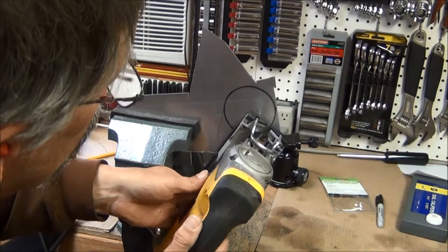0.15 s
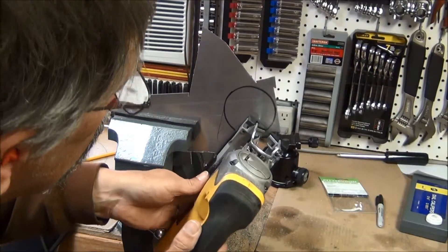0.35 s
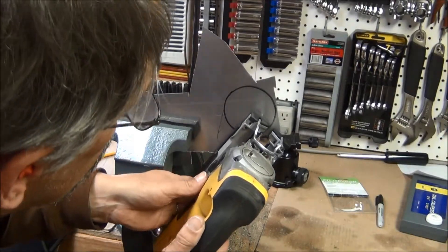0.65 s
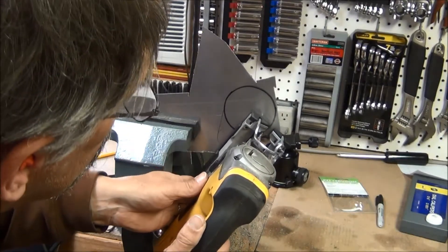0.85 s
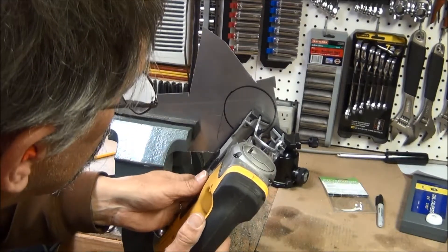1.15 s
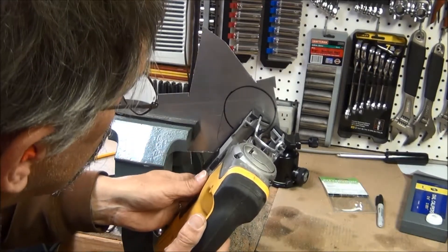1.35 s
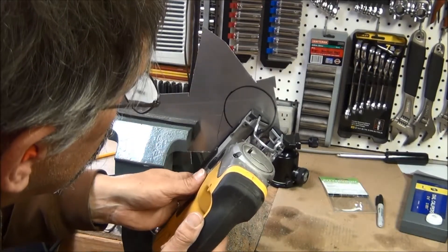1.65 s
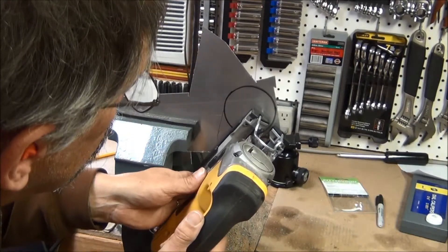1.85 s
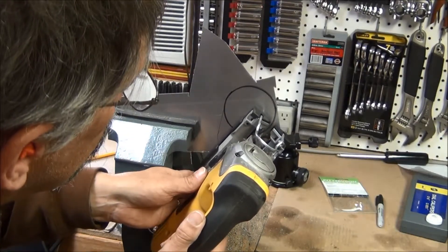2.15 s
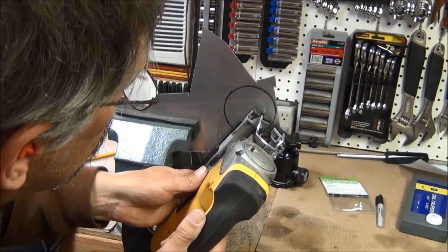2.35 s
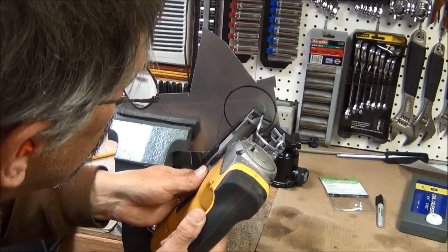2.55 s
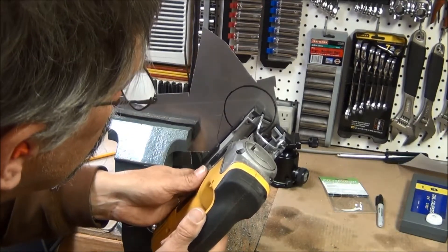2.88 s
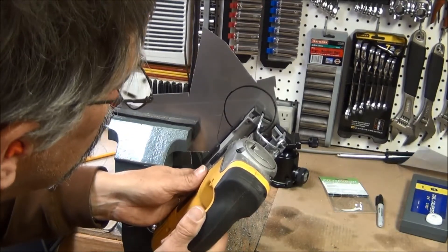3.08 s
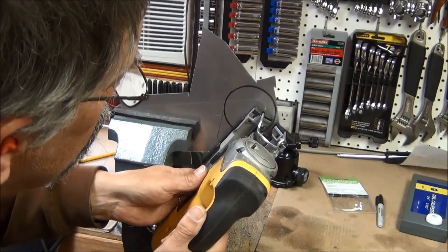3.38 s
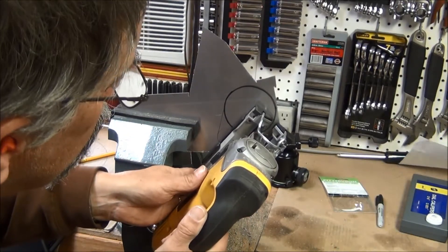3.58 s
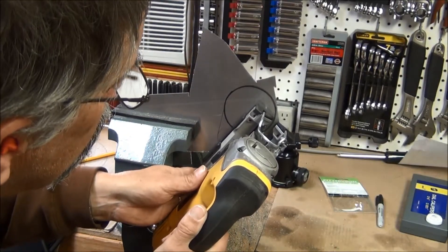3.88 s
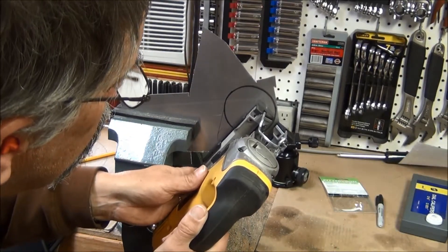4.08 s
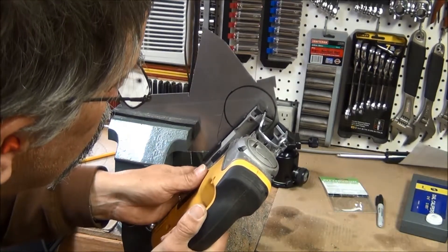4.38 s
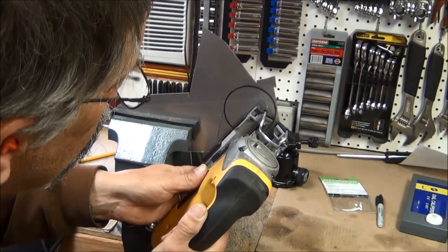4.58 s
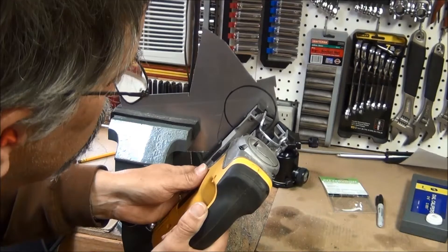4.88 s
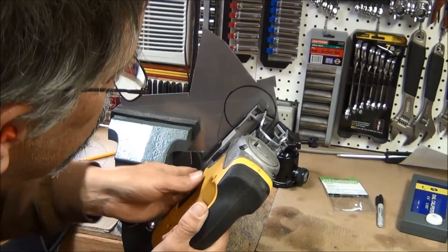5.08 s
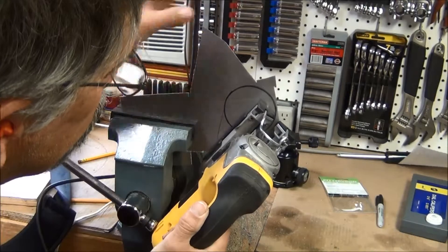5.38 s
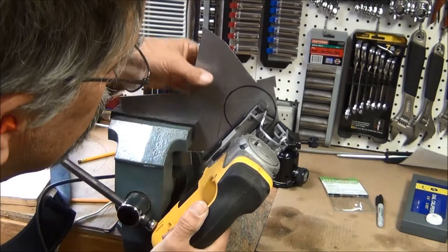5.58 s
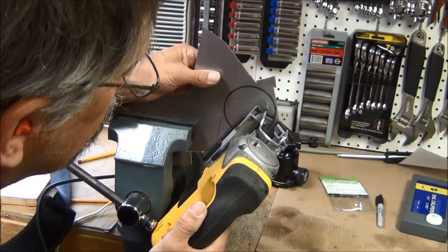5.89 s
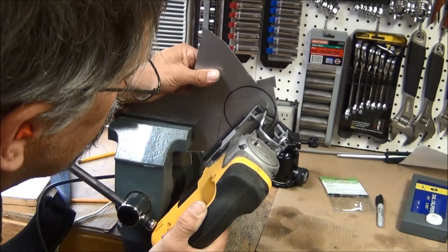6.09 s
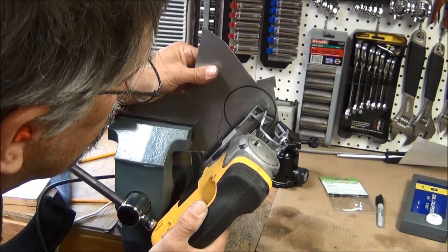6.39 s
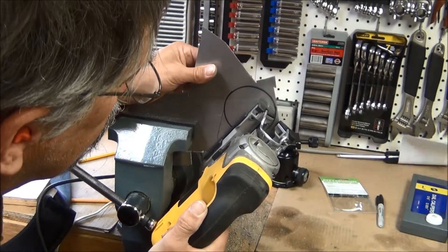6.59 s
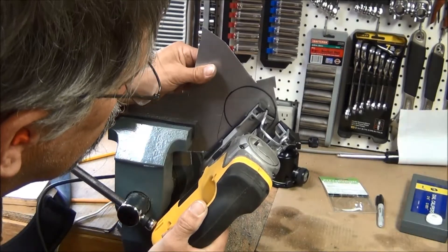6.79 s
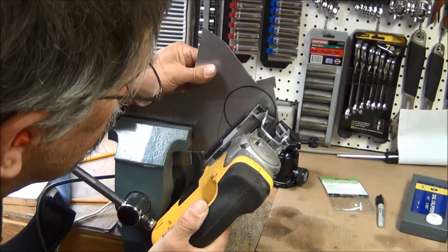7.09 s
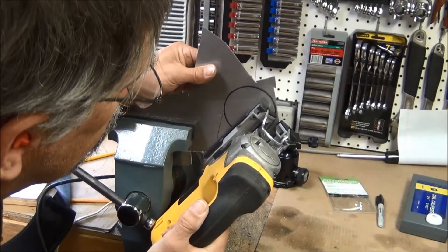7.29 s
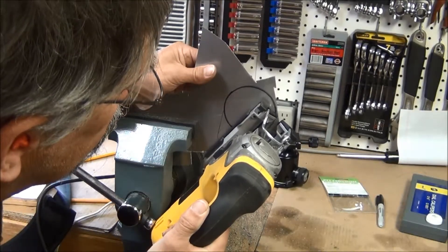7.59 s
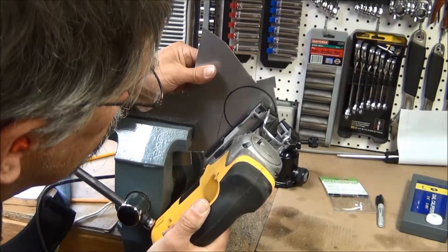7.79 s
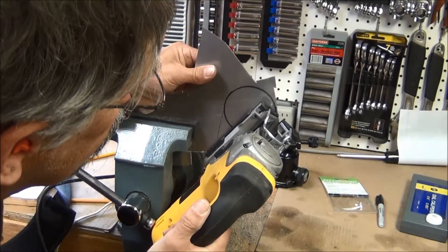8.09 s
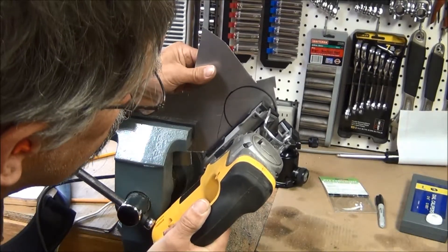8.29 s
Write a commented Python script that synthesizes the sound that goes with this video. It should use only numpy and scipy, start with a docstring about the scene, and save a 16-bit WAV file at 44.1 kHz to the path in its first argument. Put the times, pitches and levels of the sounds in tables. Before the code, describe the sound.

From 0 to 0.8 s there is only faint room hiss and hum, with soft taps and small knocks, clearest near 0.4. At about 0.85 the jigsaw switches on slowly, six or seven strokes a second, with dry motor whir and separate clicks. At 1.2 the blade hits the steel plate with a sharp knock, then skids, growling and ringing until 1.55. Strokes quicken to about thirteen a second; a hard knock lands near 1.95. From 2 to 5.2 it cuts steadily, rising to fifteen or so strokes a second: rasping teeth, metallic housing clatter, groaning gears, plate shudder and low bench thuds. Around 5.3 to 5.55 the teeth catch and let go, leaving rattle and small high squeaks. From 6.2 speed climbs rapidly, strokes blur near thirty-five a second, gears sing, and a high whine and low drone hold to the end. Close, dry, short workshop reflections.

```python
"""A jigsaw saws a steel plate held in a vise, in a small workshop; light taps and knocks come first.
Rasping noise from the teeth, clatter from the housing and thuds from plate and bench follow one crank phase.
At about 15 strokes a second each cutting stroke knocks and rasps while the gear mesh tone groans under load.
Then the trigger is pressed home: the strokes blur near 35 a second, the gears sing and the motor whines.
Noise through resonant filters makes the contacts; sines locked to the crank make gears, motor and drone."""
import sys
import numpy as np
from scipy import signal
from scipy.fft import rfft, irfft
from scipy.io import wavfile
from scipy.ndimage import uniform_filter1d

SR = 44100
rng = np.random.default_rng(int(sys.argv[2]) if len(sys.argv) > 2 else 0)


def unload_audio(sound):
    """Save the sound as a 16-bit wav file, at the path given as the first command line argument."""
    columns = np.transpose(np.atleast_2d(sound))
    # keep every value between -1 and 1, then stretch to whole-number steps
    steps = np.round(np.clip(columns, -1, 1) * 32767)
    wavfile.write(sys.argv[1], SR, steps.astype(np.int16))


N = 372644
TIME = np.arange(N) / SR


def amp(db):
    """Decibels to gain."""
    return 10 ** (np.asarray(db) / 20)


def unit(x):
    """Scales to rms 1."""
    return x / np.sqrt(np.mean(x ** 2) + 1e-20)


def curve(rows, axis=1, at=TIME):
    """One column of a table, joined by straight lines."""
    rows = np.asarray(rows, float)
    return np.interp(at, rows[:, 0], rows[:, axis])


def read(points, hz):
    """Values interpolated on a log-frequency axis."""
    f, value = np.transpose(points)
    return np.interp(np.log(hz + 1), np.log(f + 1), value)


def drift(rate_hz):
    """Random wander of rms 1, low-passed near rate_hz."""
    hz = np.fft.rfftfreq(N, 1 / SR)
    spectrum = rfft(rng.standard_normal(N)) * np.exp(-(hz / rate_hz) ** 2)
    return unit(irfft(spectrum, N))


def body(x, spectrum, modes=(), ring_db=0, size=8192):
    """Minimum-phase filter of energy 1: a broad colour with resonances standing on it."""
    hz = np.fft.rfftfreq(size, 1 / SR)
    power = amp(read(spectrum, hz)) ** 2
    for f, width_hz, db in modes:
        power = power + amp(db + ring_db) ** 2 / (1 + ((hz - f) / width_hz) ** 2) ** 2
    log_gain = np.log(np.r_[power, power[-2:0:-1]] + 1e-10) / 2
    # the Hilbert transform of the log gain gives the causal phase
    response = np.exp(np.conj(signal.hilbert(log_gain)))
    impulse = np.fft.ifft(response).real[:size // 2]
    return signal.oaconvolve(x, impulse / np.linalg.norm(impulse))[:N]


def grit(per_s, spread_db, share):
    """Tiny impacts of uneven size, holding a share of the power, in a smooth hiss."""
    sizes = amp(spread_db * np.minimum(rng.exponential(1, N), 4))
    hits = rng.random(N) < per_s / SR
    ticks = sizes * rng.choice([-1, 1], N) * hits
    share = np.clip(share, 0, 1)
    return np.sqrt(share) * unit(ticks) + np.sqrt(1 - share) * rng.standard_normal(N)


def spell(start_s, length_s, db, fade_s):
    """Gain that rises, holds for a length of time and falls."""
    to_edge_s = np.minimum(TIME - start_s, start_s + length_s - TIME)
    return amp(db) * np.clip(.5 + to_edge_s / fade_s, 0, 1)


def hump(turns, at, width):
    """A smooth swell at one place in every stroke."""
    offset = (turns - at + .5) % 1 - .5
    return np.exp(-.5 * (offset / width) ** 2)


# Trigger feathered by hand. Each row: time in s, strokes per s (until the trigger is pressed home).
SPEED = [(0.84, 6.01), (1.15, 7.21), (1.59, 12.8), (1.91, 12.16), (2.06, 13.37), (2.57, 12.77), (2.8, 13.0),
         (3.01, 14.6), (3.59, 15.92), (4.22, 15.73), (4.6, 15.04), (5.01, 15.08), (5.21, 16.16),
         (5.43, 15.03), (5.88, 14.71), (6.19, 16.56)]
# Pressed home: the rate closes in on full speed with this time constant.
PRESS_AT_S, RUN_UP_S, FULL_RATE_PER_S = 6.18, .36, 34.8


def crank():
    """Stroke rate per s, strokes done, and a gate that opens with the switch."""
    running = TIME > SPEED[0][0]
    lag = np.exp(-np.maximum(TIME - PRESS_AT_S, 0) / RUN_UP_S)
    rate = FULL_RATE_PER_S + (curve(SPEED) - FULL_RATE_PER_S) * lag
    turns = .002 + np.cumsum(rate * running) / SR
    return rate, turns, running


# Depth of the teeth. Each row: time in s, relative bite (0 = blade slides freely both ways).
BITE = [(1.5, 0.22), (1.58, 0.42), (1.7, 0.15), (2.0, 0.43), (4.3, 0.54), (5.15, 0.38), (5.3, 0.3),
        (5.56, .02)]
# Force through one stroke in the cut, before levelling. Each row: share of the stroke, blade in dB,
# gear case in dB, gear load in dB.
CUT = [(0, 4, -18, -22), (.06, -1.5, 0, -22), (.13, 0.5, -1, -12), (.3, -0.5, 4.5, -20), (.44, -6.5, 7, 5),
       (.55, -4.5, 5.5, 12), (.68, -9.5, 1.5, 6), (.82, -13.5, -1.5, 18), (.96, -9.5, -3, 16)]


def stroke(turns, axis, slide_db):
    """Force through the stroke: lightly shaped by CUT in the air, by slide_db when sliding, by CUT in the cut."""
    bite = np.clip(1.3 * curve(BITE), 0, 1)
    touching = np.clip((TIME - 1.17) / 0.059, 0, 1)
    force = amp(bite * curve(CUT, axis, turns % 1) + (1 - bite) * touching * slide_db)
    return force / np.sqrt(uniform_filter1d(force ** 2, size=11025))  # running rms over 0.25 s


def slap(turns, rate, decay_s):
    """A short burst once a stroke, as the blade turns round and takes up the play; slow strokes catch hardest."""
    catch = np.interp(rate, [13, 16], [1.2, .65])
    age_s = (turns % 1) / rate
    return catch * np.exp(-age_s / decay_s) * np.clip(curve(BITE), 0, 1)


# How hard the blade bears on the plate. Each row: time in s, force in dB (weighted by each part).
FEED = [(1.203, 0), (1.212, 7.5), (1.3, 4), (1.58, 4), (1.64, -8), (1.8, -1.5), (1.96, 3), (3.4, -1.5),
        (4.3, 0), (5.1, 0.5), (5.3, -3.5), (5.5, 0), (5.65, -3.5), (6.0, -3), (6.45, -4), (7.2, -8)]
# CUT_RATE_PER_S: stroke rate at which octave_db adds nothing
CUT_RATE_PER_S, WAKE_S = 15, 0.092


def work(rate, db, feed_share, octave_db, start_db):
    """Gain of a part: builds after switch-on, follows the feed force, shifts by octave_db per speed doubling."""
    waking = np.exp(-np.maximum(TIME - SPEED[0][0], 0) / WAKE_S)
    speed_db = octave_db * np.log2(rate / CUT_RATE_PER_S)
    return amp(db + feed_share * curve(FEED) + speed_db + start_db * waking)


def repeating(noise, rate, turns, share, count):
    """Fast and light, the mechanism repeats its jolts every turn: count uneven lines replace low noise."""
    lines = amp(2 * rng.standard_normal(count)) * np.exp(2j * np.pi * rng.random(count))
    one_turn = unit(irfft(np.r_[0, lines], count * 20))
    comb = np.interp(turns % 1, np.arange(len(one_turn)) / len(one_turn), one_turn)
    comb = comb * np.sqrt(2 * count * rate / SR)  # as strong per Hz as the noise
    low_pass = signal.butter(2, count * rate.max(), fs=SR, output="sos")
    low = signal.sosfiltfilt(low_pass, noise)
    steady = np.clip(share, 0, 1) * np.interp(rate, [17, 28], [0, 1])
    return noise + (np.sqrt(1 - steady) - 1) * low + np.sqrt(steady) * comb


# Steady hum. Each row: frequency in Hz, relative level in dB.
HUM = [(241, -72.5), (480, -70)]
# Colour of the air noise. Each row: frequency in Hz, relative density in dB per Hz.
AIR = [(20, 5.5), (400, -4), (3000, -18), (15000, -18)]


def shop_air():
    """Faint broadband room noise, mostly shared by both sides, and appliance hum as sines."""
    hum = sum(amp(db + 5.5) * np.sin(2 * np.pi * (hz * TIME + rng.random())) for hz, db in HUM)
    shared, left, right = (body(rng.standard_normal(N), AIR) for _ in range(3))
    return hum + amp(-59.5) * (shared + 0.17 * np.array([left, right]))


# Soft taps while the saw is lined up. Each row: start in s, pitch in Hz, level in dB, ring time (T60) in s.
TAPS = [(.09, 678, -48, 0.29), (.424, 680, -26.5, 0.069), (.66, 1400, -46, 0.12)]


def taps():
    """Light contacts: decaying sines of slightly unsteady phase."""
    out = np.zeros(N)
    for s, hz, db, t60_s in TAPS:
        age_s = np.maximum(TIME - s, 0)
        envelope = np.minimum(age_s / 0.012, 1) * amp(db - 60 * age_s / t60_s)
        out += envelope * np.sin(2 * np.pi * hz * age_s + 2.0 * drift(180))
    return out


# Knocks of shoe, trigger and blade. Each row: start in s, relative treble in dB, relative body in dB,
# ring time (T60) in s.
KNOCKS = [(0.162, -46, -52, 0.24), (.163, -42, -51, 0.0055), (0.183, -54, -44, 0.21),
          (0.237, -51, -56, 0.24), (0.425, -52, -41, 0.12), (.485, -59, -59, 0.37),
          (0.844, -35.5, -38, 0.016), (0.991, -28.5, -28, 0.044), (1.143, -23, -43, 0.041),
          (1.213, -17, -25, 0.2), (1.555, -23, -42, 0.07), (1.954, -14, -16, 0.034)]
# Colours of blade, housing and plate. Each row: frequency in Hz, relative density in dB per Hz.
BLADE = [(1760, -32.5), (3000, -5.5), (4760, 3), (6300, -1), (10700, 1.5), (13600, -7), (16000, -16.5)]
CASE = [(350, -57.5), (600, -10.5), (683, -8), (850, -3.5), (1290, -5.5), (1950, 0), (2550, -5.5),
        (3170, -3), (6500, -12), (8450, -14.5), (14300, -120)]
PLATE = [(76, -59), (130, -8), (193, -15), (258, -39), (334, -12), (375, 1), (487, 2), (597, -2), (850, -4),
         (1150, -88)]
# Resonances of the clamped plate. Each row: frequency in Hz, width in Hz, relative level in dB.
PLATE_MODES = [(195, 22, -13), (337.4, 19, -8), (490, 38, 1), (532, 7.7, 2.5), (679, 29, -1),
               (1196, 34, 3.5)]


def knocks():
    """Short contacts: decaying gritty noise coloured by blade, housing and plate."""
    bright, dull = np.zeros((2, N))
    for s, treble_db, body_db, t60_s in KNOCKS:
        fade = (TIME >= s) * amp(-60 * np.maximum(TIME - s, 0) / t60_s)
        bright += amp(treble_db) * fade
        dull += amp(body_db) * fade
    scrape = grit(2900, 3.2, share=0.13)
    tick = 1.5 * body(scrape * bright, BLADE)
    housing = body(scrape * (1.1 * bright + .5 * dull), CASE)
    return tick + housing + body(scrape * dull, PLATE, PLATE_MODES, ring_db=-3.0)


# Resonances of the motor shell. Each row: frequency in Hz, width in Hz, relative level in dB.
SHELL_MODES = [(1673, 100, 6), (2034, 19, 1), (2476, 180, 8), (3450, 140, 1), (4420, 86, 1.5)]


def brushes(rate, turns, running):
    """Brushes and bearings rub the motor shell: a dry whir through resonances that come and go."""
    whir = np.zeros(N)
    for hz, width_hz, db in SHELL_MODES:
        level = amp(db + 3.4 * drift(6.6))
        peak = signal.iirpeak(hz, hz / width_hz, SR)
        whir += level * unit(signal.lfilter(*peak, grit(3200, 0.65, share=0.32)))
    gain = work(rate, db=-31.5, feed_share=0, octave_db=-1.0, start_db=-31)
    return running * gain * unit(whir)


# Resonances of the saw housing. Each row: frequency in Hz, width in Hz, relative level in dB.
CASE_MODES = [(1445, 6.2, 0.5), (1723, 24, -1.5), (1799, 13.4, -1), (1971, 26, 3.5), (2164, 39, -5.5),
              (3107, 17, -1)]


def gear_case(rate, turns, running):
    """Plunger, guide and gears chatter and ring the metal housing."""
    slide_db = np.interp(rate, [15, 30], [5.5, 1.6]) * np.cos(4 * np.pi * (turns - .13))
    force = stroke(turns, axis=2, slide_db=slide_db) * amp(1.4 * drift(177))
    force = force * (1 + 1.0 * slap(turns, rate, decay_s=.002))
    jolts = repeating(grit(2500, 3, share=.25), rate, turns, share=.7, count=100)
    clatter = body(force * jolts, CASE, CASE_MODES, ring_db=7.5)
    # contacts brighten above 16 strokes/s, most at 24
    band = signal.butter(1, [2600, 4600], "bandpass", fs=SR, output="sos")
    edge = signal.sosfilt(band, clatter)
    clatter = clatter + np.interp(rate, [16, 24, 35], [0, .45, .2]) * edge
    return running * work(rate, db=-19, feed_share=0.99, octave_db=7, start_db=-29) * clatter


# Uneven teeth put side tones round the mesh tone. Each row: multiple of the stroke rate, level in dB
# at top speed, relative to the mesh.
SIDE_TONES = [(50, -1), (52, 2), (55, -0.5), (56, 0), (58, 2.5)]
# Gear sound against speed. Each row: strokes per s, level in dB before the feed force is added.
GEAR_RESPONSE = [(7, -47), (12, -42), (16, -30.5), (18, -20), (22, -21), (26, -40), (31, -47), (33, -24),
                 (34.3, -20), (34.8, -19.5)]
GEAR_TEETH = 57


def gears(rate, turns, running):
    """The mesh tone swells once a stroke under load and sings where it meets a housing resonance."""
    strain = np.clip(2 * (1 - rate / FULL_RATE_PER_S), 0, 1)
    mesh = 2 * np.pi * GEAR_TEETH * turns + 1.3 * strain * drift(70)
    # harsh under load, pure when running free
    overtone = np.interp(rate, [11, 14, 24], [.1, 1.9, 0])
    tone = np.sin(mesh) + overtone * np.sin(2 * mesh + 0.93 * drift(92))
    for order, db in SIDE_TONES:
        angle = 2 * np.pi * (order * turns + rng.random()) + .6 * drift(5)
        tone += amp(db) * (rate / rate.max()) ** 4 * np.sin(angle)
    slide_db = 4.4 * strain * np.cos(2 * np.pi * (turns - .16))
    tone = tone * stroke(turns, axis=3, slide_db=slide_db) * amp(0.91 * drift(85))
    ring = signal.lfilter(*signal.iirpeak(1972, 24, SR), tone)  # Hz, Q
    gain = amp(curve(GEAR_RESPONSE, at=rate) + .5 * curve(FEED))
    return running * gain * (0.89 * tone + 0.47 * ring)


WHINE_ORDER = 303.5  # multiple of the stroke rate


def motor(rate, turns, running):
    """The commutator whines near full speed; the field hums at 60 Hz, most at part throttle."""
    angle = 2 * np.pi * WHINE_ORDER * turns + 0.7 * drift(70) + 0.58 * np.sin(2 * np.pi * turns)
    whine_db = np.interp(rate, [28.4, 30.3, 33.2, 34.5], [-63, -18.0, -20.5, -24.0])
    hum = amp(np.interp(rate, [29, 33], [-57, -64])) * np.sin(2 * np.pi * 60 * TIME)
    return running * (amp(whine_db + 2 * drift(25)) * np.sin(angle) + hum)


# The swinging plunger makes the whole saw drone. Each row: multiple of the stroke rate, mean level in dB
# from 29 strokes per s up.
DRONE = [(6, -56.5), (9, -54), (10, -44.5), (11, -49.5), (13, -44), (20, -38), (25, -38), (29, -36)]


def drone(rate, turns, running):
    """Low multiples of the stroke rate that come up as the saw gathers speed."""
    unsteady = .4 * (FULL_RATE_PER_S / rate) ** 3
    lines = np.zeros(N)
    for order, db in DRONE:
        level = amp(db + 4.3 * drift(30))
        angle = 2 * np.pi * (order * turns + rng.random()) + unsteady * drift(44.6)
        lines += level * np.sin(angle)
    return running * amp(np.interp(rate, [20, 29], [-16, 0])) * lines


# Colour of the bench. Each row: frequency in Hz, relative density in dB per Hz.
BENCH = [(15, -17), (45, -3), (68, -15), (84, 16), (125, -45), (300, -75)]
# The blade snags for a few strokes and the bench booms. Each row: start in s, length in s, level in dB.
SNAGS = [(1.974, .21, -46), (3.855, 0.22, -45), (4.56, 0.71, -48)]
SNAG_FADE_S = 0.054


def plate(rate, turns, running):
    """Once a stroke the blade shakes the plate; the vise passes the blows on to the bench."""
    force = amp(2 * np.cos(2 * np.pi * (turns - .15))) + 2.0 * slap(turns, rate, decay_s=0.0062)
    jolts = repeating(grit(700, 3, share=.5), rate, turns, share=.72, count=40)
    shudder = body(unit(force * jolts), PLATE, PLATE_MODES, ring_db=24)
    # in the cut, each blow is a short push that sets the bench booming
    push = unit(np.diff(slap(turns, rate, decay_s=0.0012), prepend=0))
    thud = body(push + 0.35 * rng.standard_normal(N), BENCH, [(196.0, 55, -13.5)])
    shaking = work(rate, db=-31.0, feed_share=1.73, octave_db=4.0, start_db=-1) * amp(1.8 * curve(BITE))
    shaking = shaking * np.where(TIME > FEED[0][0], 1, .35)  # weaker until the blade touches
    booming = work(rate, db=-65.5, feed_share=0.46, octave_db=11, start_db=-1) * amp(29.0 * curve(BITE))
    booming = booming + sum(spell(*snag, fade_s=SNAG_FADE_S) for snag in SNAGS)
    return running * (shaking * shudder + booming * thud)


# Teeth catch on the edge entering and leaving the cut. Each row: start in s, level in dB.
CATCHES = [(1.714, -27), (1.916, -16), (5.282, -18), (5.412, -16), (5.544, -15)]
CATCH_T60_S = 0.052
# Ring of the steel under the teeth. Each row: frequency in Hz, width in Hz, relative level in dB.
STEEL_MODES = [(4680, 97, -6), (6520, 110, 2.5), (6890, 85, 1.5)]


def blade(rate, turns, running):
    """Teeth tear chips from the edge, hardest early in each stroke; sliding slowly they only brush it."""
    slide_db = np.interp(rate, [15, 30], [2.6, 1.8]) * np.cos(4 * np.pi * (turns - .13))
    force = stroke(turns, axis=1, slide_db=slide_db) * amp(1.92 * drift(390))
    force = force * (1 + 1.1 * slap(turns, rate, decay_s=.0018))
    brushing = np.clip(1 - 2 * curve(BITE), 0, 1)
    force = force * amp(-3 * brushing * (CUT_RATE_PER_S / rate) ** 2)
    force = force * running * work(rate, db=-17.0, feed_share=0.88, octave_db=6.0, start_db=-25)
    for s, db in CATCHES:
        force = force + (TIME >= s) * amp(db - 60 * np.maximum(TIME - s, 0) / CATCH_T60_S)
    return body(force * grit(5000, 2.3, share=0.67), BLADE, STEEL_MODES)


# The blade skids before the slot holds it. Each row: start in s, level in dB.
SKIDS = [(1.212, -24), (1.277, -18.5), (1.322, -15.5), (1.374, -19.5), (1.47, -20), (1.511, -17)]
# Ring of the skidding blade. Each row: frequency in Hz, width in Hz, relative level in dB.
SKID_MODES = [(1985, 27, 6), (4120, 70, -2), (7350, 50, -3), (8160, 60, 2), (12200, 70, -12)]
SKID_S, SKID_FADE_S, GROWL_HZ = 0.03, 0.015, 440


def judder(rate, turns, running):
    """Before the blade settles in the slot its teeth hop over the edge: plate growls, blade rings."""
    angle = 2 * np.pi * GROWL_HZ * TIME + 0.96 * drift(35)
    force = sum(spell(s, SKID_S, db, SKID_FADE_S) for s, db in SKIDS)
    hops = unit(amp(4.4 * np.cos(angle)) * grit(2500, 1.7, share=.5))
    return force * np.sin(angle) + amp(-2.5) * body(force * hops, BLADE, SKID_MODES, ring_db=23)


# Ring of the loose blade. Each row: frequency in Hz, width in Hz, relative level in dB.
BLADE_MODES = [(2790, 480, 0.5), (3480, 230, 3.5), (4095, 130, 5), (4780, 210, 4)]
# Chatter against speed. Each row: strokes per s, relative level in dB.
CHATTER_RESPONSE = [(11, -62), (15, -20.5), (17, -15), (23, -16), (35, -21.5)]


def chatter(rate, turns, running):
    """When the teeth let go, the blade rattles in the slot twice a stroke and rings."""
    loose = (1 - np.clip(curve(BITE), 0, 1)) ** 2 * (TIME > SKIDS[0][0])
    humps = amp(np.interp(rate, [15, 30], [8, 2]) * (np.cos(4 * np.pi * (turns - .15)) - 1.0))
    rattle = body(humps * grit(2000, 3.3, share=0.29), BLADE, BLADE_MODES, ring_db=25)
    return running * loose * amp(curve(CHATTER_RESPONSE, at=rate)) * rattle


def squeak(rate, turns, running):
    """The blade chirps against its guide roller at fixed places in each stroke, loudest when slow."""
    loose = 1 - np.clip(2 * curve(BITE), 0, 1)
    rub = hump(turns, 0.89, 0.019) + loose * hump(turns, 0.56, 0.017)
    hz = 10400 + 350 * drift(140)
    tone = np.sin(2 * np.pi * np.cumsum(hz) / SR)
    return (TIME > SKIDS[-1][0]) * rub * amp(np.interp(rate, [15, 28], [-19, -29])) * tone


# Ring of the saw housing in time with the strokes. Each row: time in s, mean level in dB before the swell.
BEATS = [(3.1, -27), (3.45, -15), (4.0, -18.5), (4.6, -14.5), (5.4, -19.5), (6.3, -23)]
BEAT_HZ, BEAT_SAG_HZ = 885, 16


def beats(rate, turns, running):
    """The gear load rings the housing in a short beat each stroke: late when cutting, early when sliding."""
    cutting = np.clip(2 * curve(BITE), 0, 1)
    late, early = hump(turns, .645, .075), hump(turns, .16, .075)
    swell = np.tanh(2.2 * (cutting * late + (1 - cutting) * early))
    hz = BEAT_HZ - BEAT_SAG_HZ * np.sin(4 * np.pi * (turns - .15))
    angle = 2 * np.pi * np.cumsum(hz) / SR
    tone = np.sin(angle) + (1.25 - 0.47 * cutting) * np.sin(2 * angle + 0.76 * drift(90))
    sounding = (TIME > BEATS[0][0]) & (TIME < BEATS[-1][0])
    return sounding * amp(curve(BEATS) + drift(25)) * swell * tone


# Reverberation. Each row: frequency in Hz, T60 in s.
ROOM = [(150, 0.008), (1000, 0.19), (5000, 0.094)]


def workshop(x, wet_db, bass_wet_db):
    """Bench and tool wall scatter the sound, differently to each side; the bass stays central."""
    t = np.arange(SR // 3) / SR
    scatter = rng.standard_normal((2, len(t))) * (t > .002)
    hz, at_s, z = signal.stft(scatter, SR, nperseg=256)
    z = z * amp(-60 * at_s / read(ROOM, hz)[:, None])
    tail = signal.istft(z, SR, nperseg=256)[1]
    tail = tail / np.linalg.norm(tail, axis=1, keepdims=True)
    hz = np.fft.rfftfreq(tail.shape[1], 1 / SR)
    wet_points = [(60, bass_wet_db - 75), (300, bass_wet_db), (1900, bass_wet_db + 2.0), (2800, wet_db)]
    tail = irfft(rfft(tail) * amp(read(wet_points, hz)), tail.shape[1])
    return x + signal.fftconvolve(x[None], tail, axes=1)[:, :N]


def scene():
    """All moving parts follow one crank; two groups of parts reach the walls by different paths."""
    motion = crank()
    strokes = plate(*motion) + blade(*motion) + judder(*motion)
    strokes = strokes + chatter(*motion) + squeak(*motion) + beats(*motion)
    contacts = taps() + knocks()
    machine = brushes(*motion) + gear_case(*motion) + gears(*motion) + motor(*motion) + drone(*motion)
    sound = sum(workshop(part, wet_db=-8, bass_wet_db=-18.0) for part in (strokes + contacts, machine))
    return sound * amp([[-.5], [.1]]) + shop_air()  # left, right dB


EDGE_HZ = 16000


def record(dry):
    """The loudest peaks are rounded off; then a low-pass at EDGE_HZ."""
    rounded = dry / (1 + (dry / .95) ** 6) ** (1 / 6)
    low_pass = signal.firwin(401, EDGE_HZ, window=("kaiser", 9), fs=SR)
    return signal.oaconvolve(rounded, low_pass[None], "same")


dry = scene()
out = record(dry)
unload_audio(out)
```